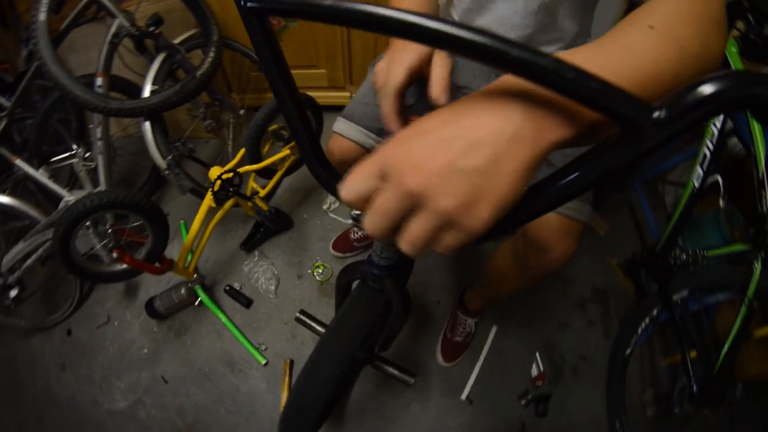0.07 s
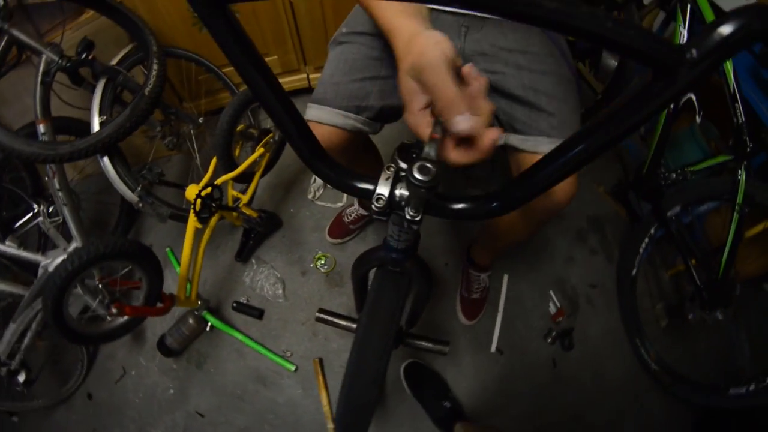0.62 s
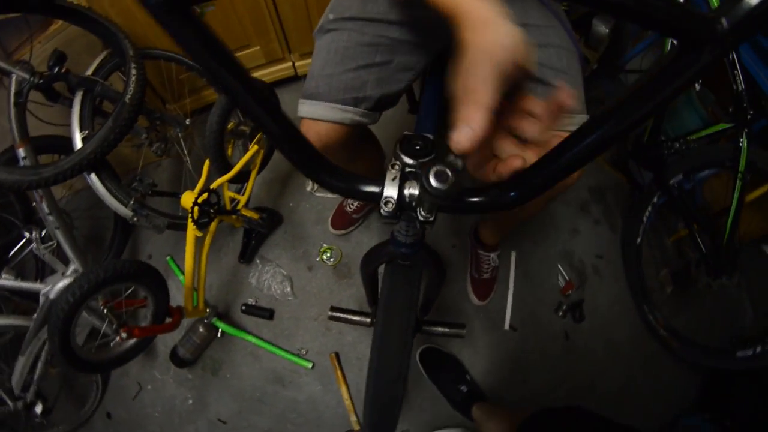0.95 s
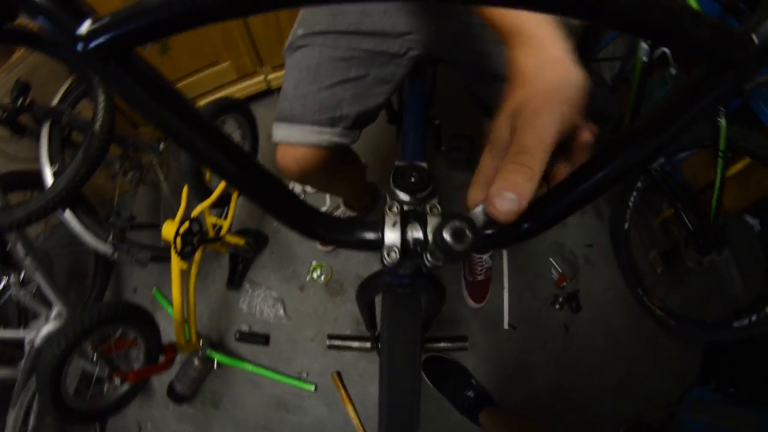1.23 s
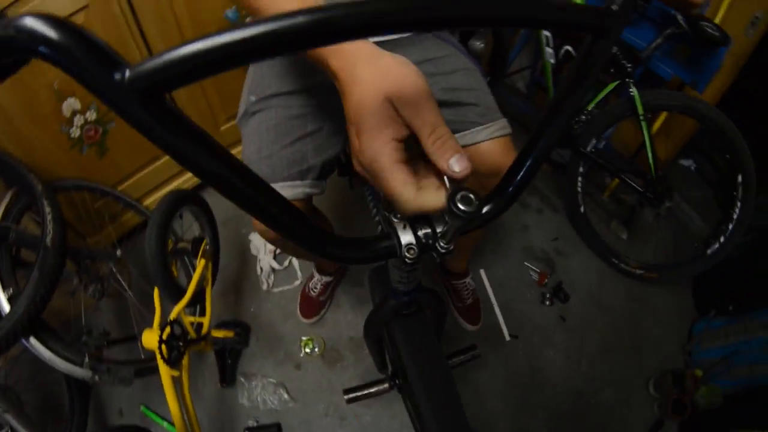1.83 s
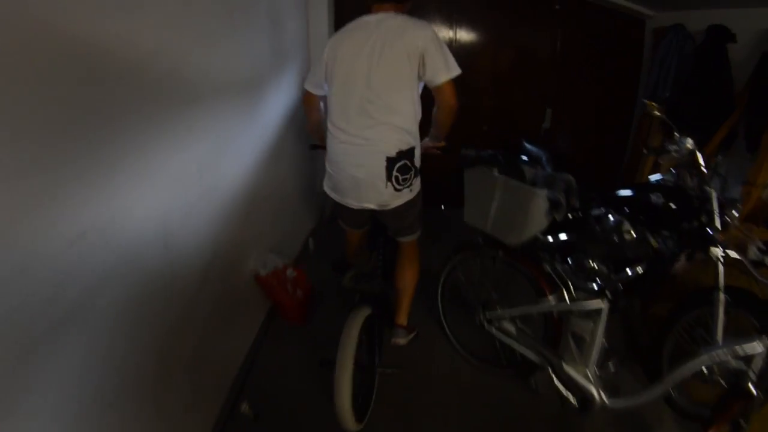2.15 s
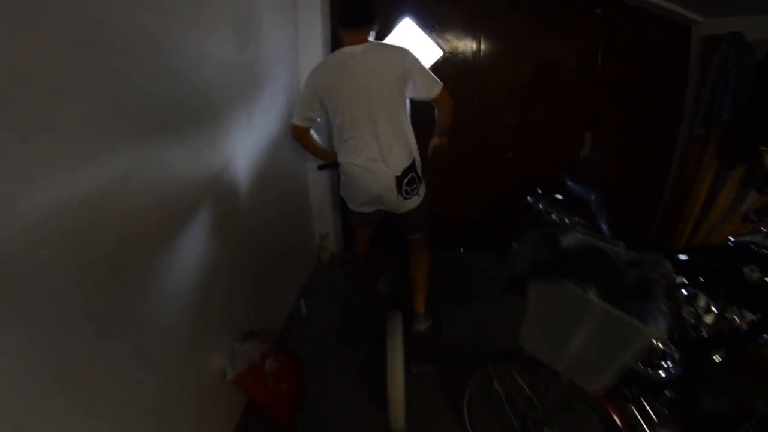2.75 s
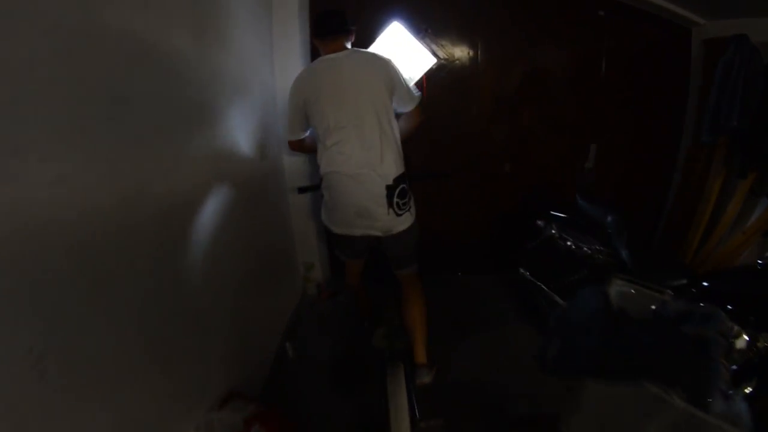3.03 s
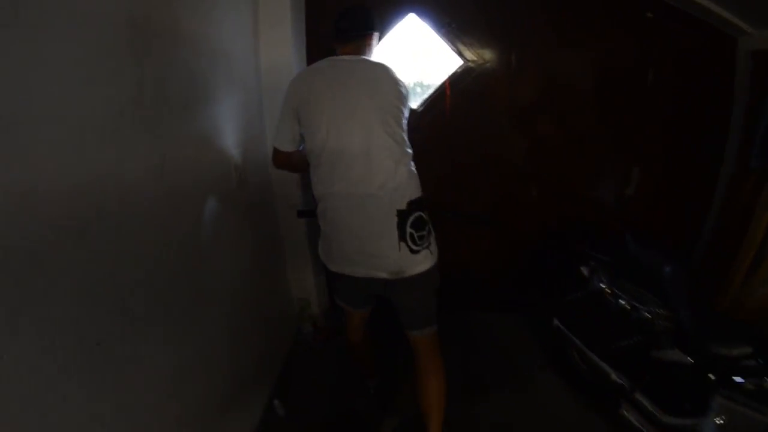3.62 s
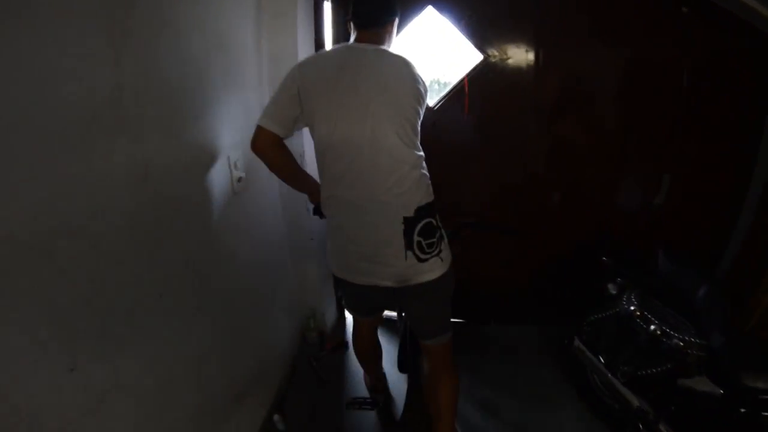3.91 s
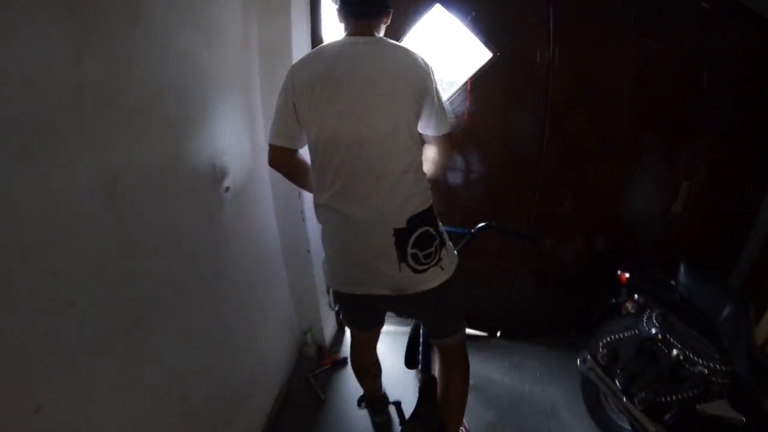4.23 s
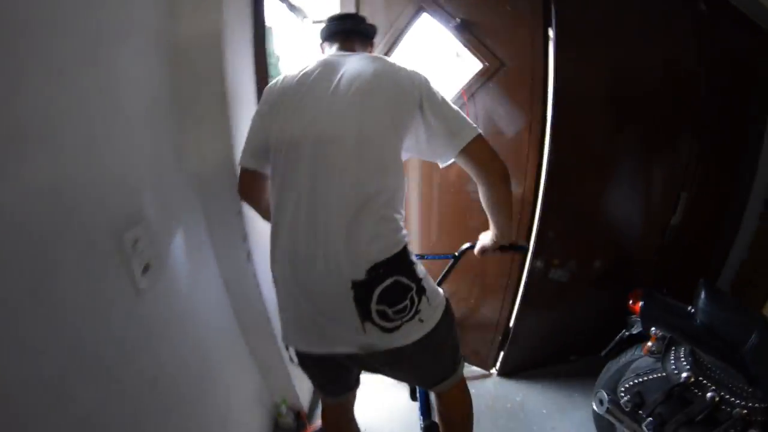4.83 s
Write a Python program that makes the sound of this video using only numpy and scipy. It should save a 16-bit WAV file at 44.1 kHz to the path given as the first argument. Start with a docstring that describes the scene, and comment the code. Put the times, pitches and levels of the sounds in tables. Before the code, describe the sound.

Metal clinks and tool clicks in a small garage, followed by gritty tyre scraping, soft steps and a big door clattering and knocking open.

```python
"""A bicycle in a small hard-walled garage. First a steel wrench strikes the stem and the handlebar rings
in its modes; a hand bumps the bar, stick-slip friction squeaks, and the wrench clicks on its bolt. Next
the bike is wheeled off, rubber rasping over gritty concrete among soft steps. A latch snaps, loose steel
rattles and a big door booms and swings open. Thin squeals sound along the way and as the tyre bounces
against the panel; last, a joint creaks. Reflections from the walls prolong these sounds."""
import sys
import numpy as np
from scipy import signal
from scipy.fft import rfft, irfft
from scipy.io import wavfile
from scipy.ndimage import uniform_filter1d, minimum_filter1d

SR = 44100
rng = np.random.default_rng(int(sys.argv[2]) if len(sys.argv) > 2 else 0)


def unload_wav(signal):
    """Save mono or channel-first audio to the path in sys.argv[1] as 16-bit WAV at rate SR, clipped to [-1, 1]."""
    wavfile.write(
        sys.argv[1],
        SR,
        np.round(np.clip(np.atleast_2d(signal).T, -1, 1) * 32767).astype(np.int16),
    )


N = 223075
TIME = np.arange(N) / SR
HIT_TIME = np.arange(2 ** 14) / SR

# reverberation time of the garage: frequency_hz, t60_s
GARAGE_DECAY = [(60, 1.73), (250, 0.74), (1000, 0.62), (3000, 0.66), (6000, 0.54), (10000, 0.43),
                (16000, 0.33)]
# reverberation relative to direct sound: source, level_db
REVERB_DB = {"stem": -5.5, "wrench": -6, "pads": 2.5, "scrape": -7.5, "latch": -1, "clatter": -6.5, "door":
             -6.5, "knocks": -7.5, "creak": -19}
# background noise: frequency_hz, level_db
AIR_SPECTRUM = [(25, -33), (60, -2.5), (110, -6.5), (260, -7), (450, -7.5), (1500, -10.5), (4000, -17.5),
                (10000, -17.5), (16000, -29.5)]
# wrench blows on the stem: start_s, level_db
STEM_CLINKS = [(.0945, -16), (.112, -29), (.1835, -29.5), (.326, -46), (.35, -43.5), (.3715, -43.5),
               (.47, -38), (1.3965, -27.5), (1.4358, -25.5)]
# steel striking steel: frequency_hz, level_db
STEEL_SPECTRUM = [(150, -26), (350, 1), (560, 1), (800, 0), (1150, -7.5), (2100, -2.5), (2800, -13.5),
                  (3700, -9), (8500, -9), (11000, -7.5), (13000, -16), (16000, -28)]
# handlebar and stem: pitch_hz, level_db, t60_s
HANDLEBAR_MODES = [(253, -9, .65), (335, -12, .35), (492, -12, .28), (660, -6, .48), (774, -1, .42),
                   (837, -5, .24), (1560, -16, .2), (2101, -6, .42), (3560, -6, .22), (3703, -7, .4),
                   (3795, -4, .22), (7147, -5, .33), (8285, -3, .27), (8440, 6.5, .15), (9630, 2, .18)]
# a hand bumps the bar: start_s, level_db
HAND_TAPS = [(.475, -38), (.552, -33), (.915, -34), (.94, -30), (1.39, -31)]
# skin and cloth slide over the bike: centre_s, width_s, level_db, tilt_db_per_octave
HAND_RUBS = [(.556, 0.0097, -49, -5), (.875, 0.024, -55, -1.5), (.923, 0.013, -49.5, 2),
             (1.385, 0.013, -43, -2), (1.69, .08, -46.5, 0.5)]
# their friction noise: frequency_hz, level_db
RUB_SPECTRUM = [(150, -15), (500, -1.5), (1200, -4.5), (2500, -7.5), (4000, -9), (10000, -12), (16000, -32)]
# dry metal sings high, rubber low: start_s, length_s, start_hz, end_hz, level_db, jitter_fraction
SQUEAL_GLIDES = [(1.26, 0.12, 6900, 6850, -55.5, 0.05), (1.356, 0.068, 870, 822, -46, 0.02),
                 (2.85, 0.13, 143, 124, -47, 0.1), (3.078, 0.0091, 10520, 10500, -26.5, .03),
                 (4.365, .025, 15500, 15500, -38, .014), (4.687, 0.046, 15400, 12900, -35, 0.04)]
# the wrench slips and seats on the bolt:
# start_s, level_db, tilt_db_per_octave, ring_db, ring_tilt_db_per_octave
WRENCH_CLICKS = [(1.395, -27, -5, -34, -20), (1.418, -19.5, -3, -37, -2), (1.436, -6, 6.5, -28, -2),
                 (1.445, -16, 10, -39, 0), (1.462, -8, 8, -37, 8.5), (1.475, -8, 12, -37.5, 9),
                 (1.486, -18, 3.5, -46, 5), (1.503, -7.5, 2.5, -38.5, 8.5), (1.509, -17, -3, -48, 3),
                 (1.566, -19, 1.5, -40, -9), (1.666, -25, -2, -42, -7)]
# one click: frequency_hz, level_db
CLICK_SPECTRUM = [(150, -50), (700, -22), (1500, -10), (3000, -12), (5000, -7.5), (7000, -7), (9000, -2.5),
                  (11000, -8.5), (13000, -16), (16000, -28)]
# the wrench itself: pitch_hz, level_db, t60_s
TOOL_MODES = [(3570, 3.5, 0.11), (8370, 8.5, 0.093), (9700, 6.5, 0.065), (9400, 5, 0.063), (12970, -20, .1)]
# the long drag along the floor: time_s, rasp_db, hiss_db
DRAG_LEVELS = [(1.99, -29, -29), (2.002, -29, -33.5), (2.096, -30, -38), (2.26, -30, -31.5),
               (2.332, -29.5, -29.5), (2.368, -27, -23.5), (2.504, -28.5, -24.5), (2.612, -24.5, -22.5),
               (2.69, -23.5, -24.5)]
# scuffs as the bike comes to rest: centre_s, rasp_db, hiss_db
TYRE_SCUFFS = [(2.883, -37, -31.5), (2.947, -41, -36)]
# coarse grains pressed lightly, coarse grains pressed hard, fine grains: frequency_hz, level_db
DULL_SPECTRUM = [(40, -54), (140, -19), (250, -10), (450, -5), (700, 0), (1700, 1.5), (2800, -2),
                 (4500, -7), (7000, -4), (15000, -30)]
KEEN_SPECTRUM = [(100, -33.5), (300, -10.5), (700, -3), (1700, 2), (2700, 0), (4000, -1.5), (5200, -7),
                 (15000, -36)]
HISS_SPECTRUM = [(2000, -42), (4500, -8), (6500, -3.5), (9500, 2.5), (11000, 0), (13000, -10.5),
                 (16000, -23)]
# the rubber bites harder: centre_s, width_s, resonance_hz, level_db
TYRE_BITES = [(2.61, 0.024, 2560, -26.5), (2.673, 0.016, 1830, -30)]
# soft steps: start_s, level_db, tilt_db_per_octave
STEPS = [(2.246, -36, -5.5), (2.711, -36, -2), (2.955, -34.5, 1), (3.04, -35, 4.5), (3.344, -36, 1)]
# a sole landing: frequency_hz, level_db
STEP_SPECTRUM = [(40, -30), (160, -13), (245, 1), (380, -5), (800, -11), (2000, -19.5), (9000, -33.5),
                 (16000, -56)]
# the latch snaps twice: start_s, level_db, tilt_db_per_octave, decay_s, ring_db
LATCH_SNAPS = [(3.289, -28, 0, 0.011, -32), (3.367, -11.5, 3, 0.0064, -15.5)]
# the sprung latch: pitch_hz, level_db, t60_s
SNAP_MODES = [(1550, -17, .2), (2350, -12, .14), (2568, -13, .2), (3714, -12, .04), (8021, 1, .05),
              (10150, -4, .14)]
# contact of steel fittings: frequency_hz, level_db
FITTING_SPECTRUM = [(100, -19.5), (300, -9.5), (700, -13.5), (1100, -7), (1700, -5.5), (2500, -5),
                    (4200, -6), (6200, -3.5), (7500, -4.5), (10300, 0.5), (12000, -8), (14000, -19),
                    (16000, -22)]
# jolts of loose fittings: start_s, level_db, tilt_db_per_octave, loss_per_bounce_db
FITTING_JOLTS = [(3.436, -17.5, -3, 6.5), (3.446, -16, -2.5, 14), (3.48, -15.5, -2, 6), (3.494, -9, -1, 14),
                 (3.514, -10.5, 0, 17), (3.532, -11, -0.5, 14), (3.5847, -3.5, 0.5, 7.5),
                 (3.644, -16.5, 0.5, 9), (3.916, -41.5, 5, 17.5), (4.1, -34, -3, 1),
                 (4.318, -37.5, -4.5, -1), (4.342, -30, -4, 4.5), (4.384, -30.5, -2, 17),
                 (4.425, -27.5, -0.5, 7), (4.477, -21.5, 1.5, 19), (4.592, -28.5, 0.5, 25),
                 (4.694, -27.5, -2.5, 20), (4.765, -30.5, -5, 9), (4.919, -42.5, 3, 19)]
# the door bolt knocks in its keeper: start_s, level_db, tilt_db_per_octave
BOLT_BLOWS = [(3.483, -34, 6.5), (3.512, -32, 5), (3.53, -25, 3), (3.597, -14.5, 0), (3.638, -25, 2)]
# that bolt: pitch_hz, level_db, t60_s
DOOR_BOLT_MODES = [(1092, -7, .4), (5300, -9, .36), (6043, 1, .42), (6215, -5, .38), (6815, -8, .5),
                   (6943, -6, .33), (6987, -4, .25), (7716, -7, .3), (9395, -6, .25), (10340, -8, .34)]
# blows that shake the door: start_s, level_db, tilt_db_per_octave, decay_s, ring_db
DOOR_BLOWS = [(3.446, -25.5, 1.5, 0.12, -38), (3.5, -19, 3, 0.09, -25.5), (3.587, -21, 1, 0.0097, -25),
              (4.103, -43.5, 4.5, 0.069, -52), (4.375, -34, -7, .05, -48), (4.44, -27, -4, 0.1, -44)]
# a dull blow on the panel: frequency_hz, level_db
THUD_SPECTRUM = [(25, -22), (45, -13), (80, -0.5), (200, 3), (300, 4), (410, -1.5), (620, -4.5), (850, -8),
                 (1300, -11), (3000, -26.5), (12000, -84)]
# the booming panel: pitch_hz, level_db, t60_s
PANEL_MODES = [(82, -13, 1.5), (107.3, -3, 0.56), (172, 2.5, 1.03), (201, -4, 0.34), (249, 10.5, 0.67),
               (338, -6, 0.74), (351, -3, 0.71), (476, -12, 0.41), (606, 2, 0.19)]
# the tyre first leans on the door: start_s, level_db
TYRE_NUDGE = [(4.317, -19.5)]
# then hits it and bounces: start_s, level_db, slap_db, thump_lag_s
TYRE_KNOCKS = [(4.427, -13, -21.5, .019), (4.536, -17.5, -29.5, .018), (4.638, -21, -33, 0.01454),
               (4.694, -36, -37, .01)]
# the door as it is leant on, is knocked and gives way: pitch_hz, level_db, t60_s
LEAN_MODES = [(80.7, -6.5, 0.53), (108, 8, 0.075), (192, -3.5, 0.14)]
WOOD_MODES = [(409.5, 3.5, 0.1), (448, -1.5, 0.12), (560, 3.5, 0.057), (622, 1, 0.074), (684, -15, 0.21),
              (815, -8, 0.2)]
THUMP_MODES = [(67, -12, 0.24), (158.3, -3.5, 0.12), (195.7, 6, 0.1), (251.8, -3, 0.19), (348, -2, 0.061)]
# slips of a creaking joint: start_s, level_db, tilt_db_per_octave, decay_s
JOINT_SLIPS = [(4.766, -28.5, -1.5, 0.01), (4.9755, -22.5, -6, 0.0041), (5.017, -23.5, -5, 0.0043),
               (5.0325, -25, -6.5, 0.0082), (5.046, -12, -1, 0.0023)]
# resonances of the joint: frequency_hz, level_db
JOINT_SPECTRUM = [(200, -34), (750, -14.5), (1100, -11.5), (1620, 2), (1900, -3), (2220, 3), (2650, -3),
                  (3000, -15), (3360, -5), (4500, -17), (6300, -12), (7300, -13), (8450, -9), (16000, -25)]


def amp(db):
    """Amplitude ratio of a level in decibels."""
    return 10 ** (np.asarray(db) / 20)


def unit(x):
    """Normalisation to rms 1."""
    return x / np.sqrt(np.mean(x ** 2))


def at_hz(points, hz):
    """Interpolation on a logarithmic frequency axis."""
    frequencies, values = np.transpose(points)
    return np.interp(np.log(hz + 1), np.log(frequencies), values)


def add(track, start_s, sound):
    """Superposition of a sound on a track."""
    i = int(np.clip(start_s * SR, 0, N - 1))
    track[i:i + len(sound)] += sound[:N - i]


def colour(x, spectrum, tilt=0):
    """Minimum-phase filtering, tilted in dB per octave; white noise keeps its power."""
    size = 2 ** 12
    hz = np.arange(size // 2 + 1) * SR / size
    magnitude = unit(amp(at_hz(spectrum, hz) + tilt * np.log2(np.maximum(hz, 60))))
    cepstrum = irfft(np.log(magnitude))
    cepstrum[1:size // 2] *= 2  # folding makes the filter causal
    cepstrum[size // 2 + 1:] = 0
    return signal.fftconvolve(x, irfft(np.exp(rfft(cepstrum))))[:len(x)]


def walk(rate_hz):
    """Slow random modulation with a spread near 1."""
    return np.interp(TIME * rate_hz, np.arange(2 ** 11), rng.standard_normal(2 ** 11))


def swell(centre_s, width_s):
    """A Gaussian envelope of height 1."""
    return np.exp(-((TIME - centre_s) / width_s) ** 2)


def grit(spread_db):
    """Friction noise: dense micro-impacts of unequal size."""
    return unit(rng.standard_normal(N) * amp(spread_db * np.minimum(rng.exponential(size=N), 7)))


def restless(x, depth_db, cell_size=5):
    """Spectral modulation at rms 1: resonances come and go as a contact patch moves."""
    cells = signal.stft(x, nperseg=2 ** 9)[2]
    field = uniform_filter1d(rng.standard_normal(cells.shape), size=cell_size, axis=0)
    field = uniform_filter1d(field, size=2 * cell_size, axis=1)
    return unit(signal.istft(cells * amp(depth_db * unit(field)))[1][:N])


def bounces(start_s, db, gap_s, loss_db):
    """An impact and two rebounds, a fixed level step apart: start_s, level_db."""
    return [(start_s + k * gap_s, db - k * loss_db) for k in range(3)]


def contacts(hits, spectrum, rise_s):
    """Contact noise: two surfaces chatter in a burst that decays exponentially."""
    out = np.zeros(N)
    for start_s, db, tilt, decay_s in hits:
        envelope = np.exp(-HIT_TIME / decay_s) * (1 - np.exp(-HIT_TIME / rise_s))
        burst = colour(rng.standard_normal(len(envelope)) * envelope, spectrum, tilt)
        add(out, start_s, amp(db) * unit(burst) * np.sqrt(np.mean(envelope ** 2)))
    return out


def ring(blows, modes, rise_s, detune=0., split_hz=7, tilts=0):
    """Free vibration: each blow excites damped modes, in a mix that depends on how it lands."""
    hz, db, t60 = np.transpose(modes)[:, :, None]
    t = TIME[:int(SR * t60.max())]
    fades = amp(db) * np.exp(-np.log(1000) * t / t60) * (1 - np.exp(-t / rise_s))
    out = np.zeros(N)
    for (start_s, blow_db), tilt in zip(blows, np.broadcast_to(tilts, len(blows))):
        mix_db, shift, split = rng.standard_normal((3, len(modes), 1))
        phase = 2 * np.pi * hz * (1 + detune * shift) * t
        # each mode beats against a weaker twin
        pair = np.sin(phase) + .5 * np.sin(phase + 2 * np.pi * split_hz * split * t)
        gains = amp(blow_db + mix_db + tilt * np.log2(hz / hz[0]))
        add(out, start_s, (gains * fades * pair).sum(axis=0) / np.sqrt(2 * np.pi))
    return out


def garage(x, wet_db):
    """Reverberation: dense wall reflections follow the direct sound, and the treble dies first."""
    t = TIME[:SR]
    noise = rfft(rng.standard_normal(SR))
    centres_hz = np.geomspace(50, 16000, 12)
    band_index = np.interp(np.log(np.arange(len(noise)) + 1), np.log(centres_hz), np.arange(12))
    tail = np.zeros(SR)
    for k, hz in enumerate(centres_hz):
        band = irfft(noise * np.maximum(1 - abs(band_index - k), 0))
        tail += band * np.exp(-np.log(1000) * t / at_hz(GARAGE_DECAY, hz))
    tail *= 1 - np.exp(-(t / 0.001) ** 2)
    return x + amp(wet_db) * signal.fftconvolve(x, unit(tail))[:N] / np.sqrt(SR)


def air(floor_db=-53.5, rush_db=19, swing_s=4.464, rise_s=0.15, fall_s=0.64):
    """Broadband background noise wavers throughout and swells as the door swings."""
    swinging = np.interp(TIME, [swing_s - rise_s, swing_s, swing_s + fall_s], [0, 1, 0])
    return colour(rng.standard_normal(N), AIR_SPECTRUM) * amp(floor_db + rush_db * swinging + walk(6.6))


def stem(decay_s=0.005, tilt=2, hardest_ring_db=-24.5, ring_growth=1.9):
    """Impact excitation: steel ticks on steel and the hollow bar rings, hardly at all if touched lightly."""
    ticks = contacts([(s, db, tilt, decay_s) for s, db in STEM_CLINKS], STEEL_SPECTRUM, rise_s=0.00015)
    hardest_db = max(db for _, db in STEM_CLINKS)
    blows = [(s, hardest_ring_db + ring_growth * (db - hardest_db)) for s, db in STEM_CLINKS]
    bar = ring(blows, HANDLEBAR_MODES, rise_s=0.0016, split_hz=6.8)
    return garage(ticks, REVERB_DB["stem"]) + garage(bar, wet_db=-10)


def hands(softness_tilt=-11, grip_t60_s=0.18):
    """Soft impacts excite the bar's low modes, which the grip damps; skin and cloth add friction noise."""
    held_modes = [(hz, db, min(t60, grip_t60_s)) for hz, db, t60 in HANDLEBAR_MODES]
    hum = ring(HAND_TAPS, held_modes, rise_s=0.0025, detune=.01, tilts=softness_tilt)
    grains = grit(spread_db=2.5)
    rubs = sum(amp(db) * swell(s, width_s) * colour(grains, RUB_SPECTRUM, tilt)
               for s, width_s, db, tilt in HAND_RUBS)
    return garage(hum + rubs, wet_db=-9.5)


def squeals():
    """Stick-slip oscillation: rubbing parts lock briefly into one rough, gliding tone."""
    out = np.zeros(N)
    for start_s, length_s, start_hz, end_hz, db, jitter in SQUEAL_GLIDES:
        size = int(length_s * SR)
        wander = unit(uniform_filter1d(rng.standard_normal(size), size=25))
        hz = np.linspace(start_hz, end_hz, size) * (1 + jitter * wander)
        tone = np.sin(2 * np.pi * np.cumsum(hz) / SR)
        add(out, start_s, amp(db) * signal.windows.tukey(size) * tone)
    return garage(out, wet_db=-9)


def wrench(decay_s=0.001):
    """Brief contacts have wide spectra: bright clicks rebound and leave a thin ring in the tool."""
    hits = [(at, hit_db, tilt, decay_s) for s, db, tilt, _, _ in WRENCH_CLICKS
            for at, hit_db in bounces(s, db, gap_s=0.0048, loss_db=13)]
    clicks = contacts(hits, CLICK_SPECTRUM, rise_s=.0001)
    blows = [(s, ring_db) for s, _, _, ring_db, _ in WRENCH_CLICKS]
    tilts = [ring_tilt for *_, ring_tilt in WRENCH_CLICKS]
    tool = ring(blows, TOOL_MODES, rise_s=.0003, detune=0.0033, tilts=tilts)
    return garage(clicks, REVERB_DB["wrench"]) + tool


def scrape(start_s=1.9865, end_s=2.6954, scuff_s=0.027, judder_db=0.4):
    """Sliding friction of rubber on concrete: coarse grains rasp, fine ones hiss, and the grip judders."""
    times, rasp_db, hiss_db = np.transpose(DRAG_LEVELS)
    sudden_onset = np.clip((TIME - start_s) / 0.0004, 0, 1)
    released_s = np.maximum(TIME - end_s, 0)
    # on release the rasp falls 200 dB a second, the hiss 332
    coarse = sudden_onset * amp(np.interp(TIME, times, rasp_db) + 1.3 - 200 * released_s)
    fine = sudden_onset * amp(np.interp(TIME, times, hiss_db) + 1.0 - 332 * released_s)
    for s, scuff_rasp_db, scuff_hiss_db in TYRE_SCUFFS:
        coarse += amp(scuff_rasp_db) * swell(s, scuff_s)
        fine += amp(scuff_hiss_db) * swell(s, scuff_s)
    grains = restless(grit(spread_db=2), depth_db=1.5)
    # pressing harder turns the rasp from dull at -32 dB to keen 8 dB higher
    keen = np.clip((20 * np.log10(coarse + 1e-9) + 32) / 8, 0, 1)
    rasp = (1 - keen) * colour(grains, DULL_SPECTRUM, tilt=-0.96) + keen * colour(grains, KEEN_SPECTRUM)
    hiss = colour(restless(grit(spread_db=-2), depth_db=1.5), HISS_SPECTRUM)
    friction = coarse * rasp + fine * hiss + bites()
    return garage(friction * amp(judder_db * walk(70)), REVERB_DB["scrape"])


def footsteps(decay_s=0.02):
    """A compliant sole spreads its impact over time, so each step is dull."""
    hits = [(s, db, tilt, decay_s) for s, db, tilt in STEPS]
    return garage(contacts(hits, STEP_SPECTRUM, rise_s=0.012), REVERB_DB["pads"])


def bites(half_width_octaves=0.67, edge_db=-14):
    """Resonance gathers the rasp into one band where the rubber bites harder."""
    out = np.zeros(N)
    ratio = 2 ** half_width_octaves
    for s, width_s, hz, db in TYRE_BITES:
        peak = [(100, -55), (hz / ratio, edge_db), (hz, 0), (hz * ratio, edge_db), (16000, -45)]
        out += amp(db) * swell(s, width_s) * colour(grit(spread_db=2.5), peak)
    return out


def latch():
    """A spring releases its energy in an impact that excites short, bright modes."""
    snaps = contacts([snap[:4] for snap in LATCH_SNAPS], FITTING_SPECTRUM, rise_s=0.0009)
    blows = [(s, ring_db) for s, *_, ring_db in LATCH_SNAPS]
    return garage(snaps + ring(blows, SNAP_MODES, rise_s=0.00047, split_hz=45), REVERB_DB["latch"])


def clatter(decay_s=0.014):
    """Repeated collisions: loose steel rebounds at each jolt, and the lightly damped bolt rings on."""
    hits = [(at, hit_db, tilt, decay_s) for s, db, tilt, loss_db in FITTING_JOLTS
            for at, hit_db in bounces(s, db, gap_s=.019, loss_db=loss_db)]
    chatter = contacts(hits, FITTING_SPECTRUM, rise_s=0.00082)
    chatter = restless(chatter, depth_db=2.5, cell_size=3) * np.std(chatter)
    blows = [(s, db) for s, db, _ in BOLT_BLOWS]
    tilts = [tilt for _, _, tilt in BOLT_BLOWS]
    bolt = ring(blows, DOOR_BOLT_MODES, rise_s=0.00071, detune=0.00132, split_hz=11.6, tilts=tilts)
    return garage(chatter, REVERB_DB["clatter"]) + bolt


def door():
    """Plate vibration: dull blows set the big panel booming in its low modes."""
    thuds = contacts([blow[:4] for blow in DOOR_BLOWS], THUD_SPECTRUM, rise_s=0.0023)
    blows = [(s, ring_db) for s, *_, ring_db in DOOR_BLOWS]
    return garage(thuds, REVERB_DB["door"]) + ring(blows, PANEL_MODES, rise_s=0.0075, split_hz=2.55)


def tyre_knocks():
    """Inelastic bounces: the tyre leans, then slaps; the wooden door knocks, shudders and thumps."""
    slaps = [(s, slap_db, 6, .011) for s, _, slap_db, _ in TYRE_KNOCKS]
    thumps = [(s + lag_s, db + 4.5) for s, db, _, lag_s in TYRE_KNOCKS]
    shudders = [(s, db - 12, 1.5, .035) for s, db, _, _ in TYRE_KNOCKS]
    slap = contacts(slaps, THUD_SPECTRUM, rise_s=0.001)
    knock = ring([(s, db) for s, db, _, _ in TYRE_KNOCKS], WOOD_MODES, rise_s=0.0024, detune=0.026)
    thump = ring(thumps, THUMP_MODES, rise_s=0.0041, detune=0.017)
    shudder = contacts(shudders, THUD_SPECTRUM, rise_s=0.0056)
    nudge = ring(TYRE_NUDGE, LEAN_MODES, rise_s=0.0062)
    return garage(nudge + slap + knock + shudder + thump, REVERB_DB["knocks"])


def creak():
    """Slow stick-slip: each separate slip excites the resonances of a joint."""
    return garage(contacts(JOINT_SLIPS, JOINT_SPECTRUM, rise_s=0.00065), REVERB_DB["creak"])


def scene():
    """Superposition: the pressures of all sources add at one point."""
    bicycle = air() + stem() + hands() + squeals() + wrench() + scrape() + footsteps()
    return (bicycle + latch() + clatter() + door() + tyre_knocks() + creak())[None]


def record(dry, ceiling=.76, cutoff_hz=15900):
    """Fast limiting holds down the loudest peaks; a low-pass filter cuts the top."""
    gain = np.minimum(1, ceiling / (abs(dry) + 1e-9))
    gain = uniform_filter1d(minimum_filter1d(gain, size=129), size=129)
    return signal.sosfilt(signal.ellip(8, .2, 70, cutoff_hz, fs=SR, output="sos"), dry * gain)


dry = scene()
out = record(dry)
unload_wav(out)
```